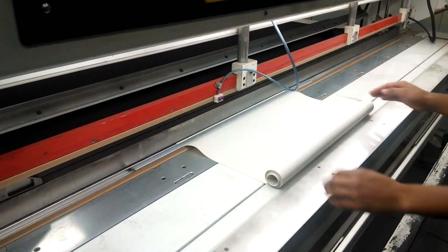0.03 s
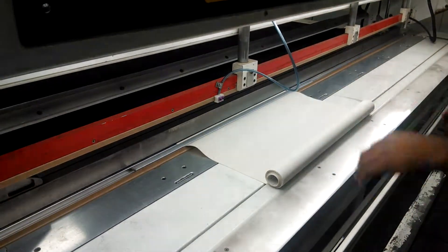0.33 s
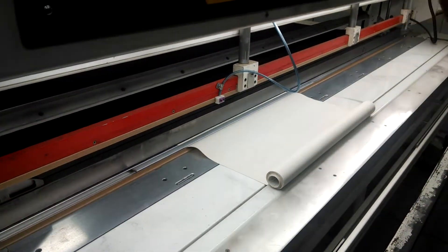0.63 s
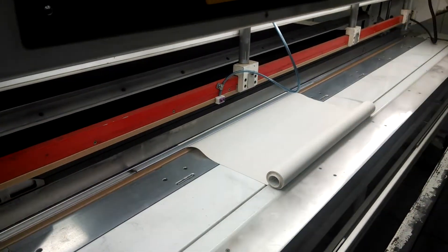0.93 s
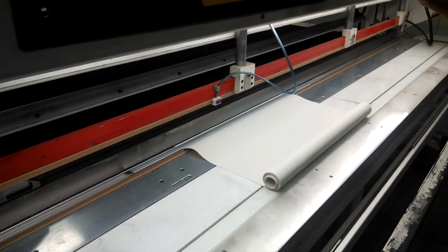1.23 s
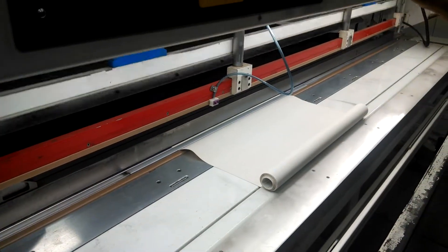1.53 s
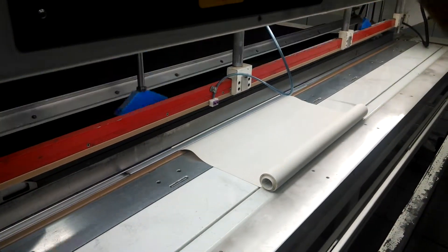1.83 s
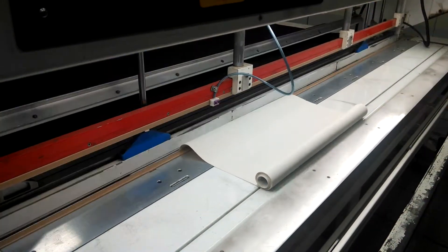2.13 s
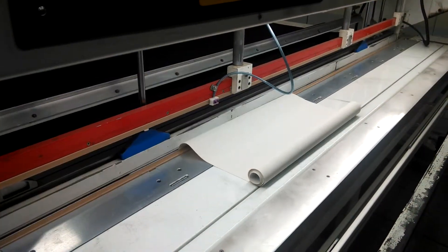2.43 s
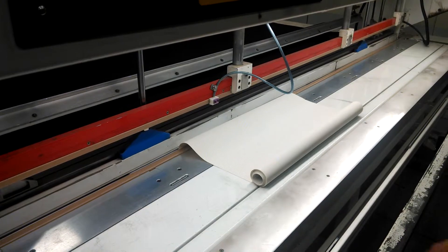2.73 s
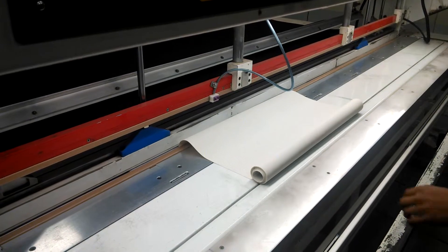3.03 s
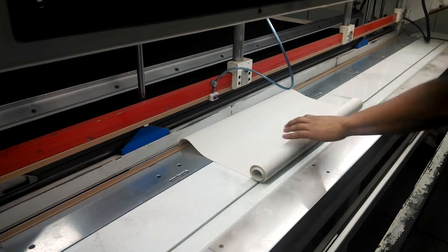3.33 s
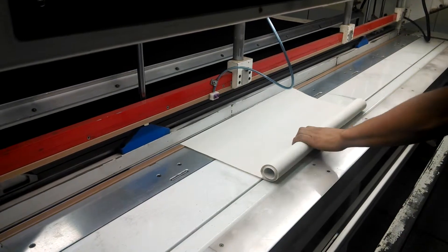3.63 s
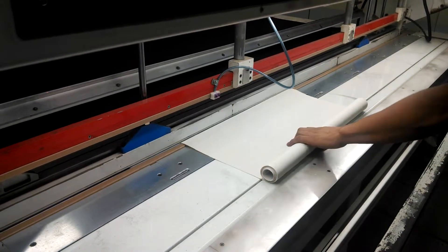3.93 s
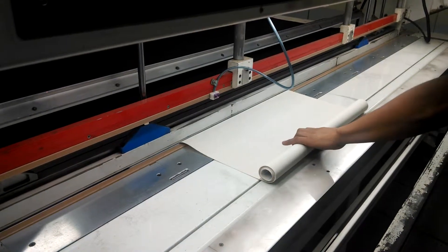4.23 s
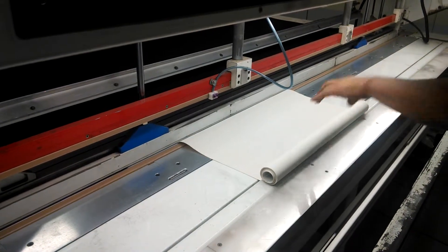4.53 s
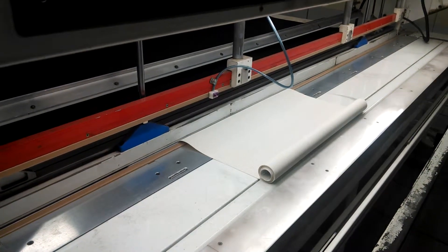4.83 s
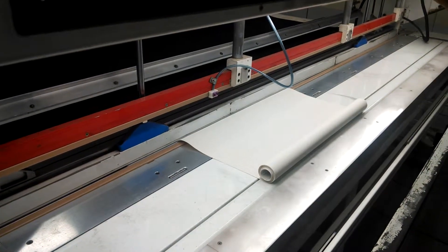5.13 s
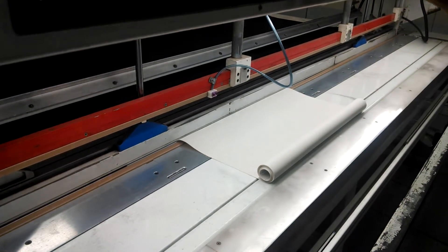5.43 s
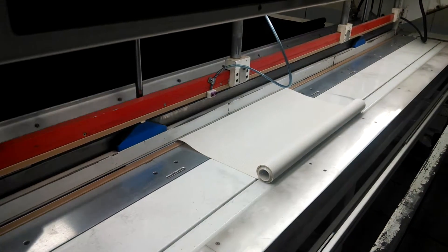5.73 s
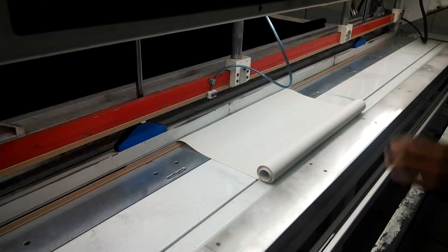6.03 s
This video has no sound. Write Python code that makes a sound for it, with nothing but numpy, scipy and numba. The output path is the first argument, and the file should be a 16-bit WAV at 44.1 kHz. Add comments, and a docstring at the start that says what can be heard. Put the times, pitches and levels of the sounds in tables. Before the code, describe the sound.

A faint workshop rumble runs underneath, with a slight rustle of plastic film at the start. From about 0.9 seconds come a tiny puff of air and several light valve clicks. At 1.4 seconds a nearby pneumatic sealer pops and releases a loud, bright hiss, slightly to the right, with an extra spurt at 1.9. It ends around 2.2 seconds with sharp snaps and a knock as the bar seats. The background dips, then slowly returns. Around 3.6 seconds a hand softly pats the film roll, crinkling it and faintly ringing the steel table. Valves click again between 5 and 5.4 seconds. At 5.5 a second loud hiss begins and gradually dulls. Around 6 seconds the rising bar knocks and judders with a short groan, then clanks against its top stop at about 6.3 as the air dies away.

```python
"""A workshop with a pneumatic bag sealer. Film rustles, valves clack, air exhausts loudly and the
sealing bar comes down on the film. A hand lands on the film roll and rings the steel table; air blasts
again and the bar judders back up to its top stop. A phone close by turns its gain down in each blast,
so the shop's rumble sinks and slowly returns."""
import sys
import numpy as np
from scipy import signal
from scipy.fft import rfft, irfft, next_fast_len
from scipy.io import wavfile
from scipy.ndimage import uniform_filter1d
from numba import njit

SR = 44100
rng = np.random.default_rng(int(sys.argv[2]) if len(sys.argv) > 2 else 0)


def waveform_to_disk(signal):
    """Save audio, clipped to [-1, 1], as 16-bit WAV at the path in sys.argv[1]."""
    frames = np.transpose(np.atleast_2d(signal))
    scaled = np.clip(frames, -1, 1) * 32767
    samples = np.round(scaled).astype(np.int16)
    wavfile.write(sys.argv[1], SR, samples)


N = 276507
TIME = np.arange(N) / SR
NFFT = next_fast_len(N + SR)
FREQ = np.arange(NFFT // 2 + 1) * SR / NFFT + 1e-9


def undb(db):
    """Decibels to gain."""
    return 10 ** (np.asarray(db) / 20)


def unit(x):
    """Scale to unit rms."""
    return x / np.sqrt(np.mean(x ** 2))


def along(points, hz=FREQ):
    """Interpolate (f/Hz, value) points over log frequency."""
    f, value = np.transpose(points)
    return np.interp(np.log(hz), np.log(f), value)


def shape(x, response):
    """Filter by a frequency response."""
    return irfft(rfft(x, NFFT) * response, NFFT)[..., :N]


def noise(colour):
    """Unit noise coloured by (f/Hz, level/dB) points."""
    return unit(shape(rng.standard_normal(N), undb(along(colour))))


def resonances(rows):
    """Response of parallel (f/Hz, width/Hz, level/dB) resonators."""
    return sum(undb(db) / (1 + 1j * hz / width * (FREQ / hz - hz / FREQ)) for hz, width, db in rows)


def waver(rate_hz):
    """Smooth random motion, unit rms."""
    step = int(SR / rate_hz)
    held = np.repeat(rng.standard_normal(N // step + 1), step)
    return unit(uniform_filter1d(held, step)[:N])


def fade(t, t60):
    """Exponential decay from t = 0, silent before."""
    return (t >= 0) * np.exp(-np.log(1000) * np.clip(t / t60, 0, 10))


def gate(start, length, attack_s, t60_s):
    """Envelope: rise, hold, decay."""
    return np.clip((TIME - start) / attack_s, 0, 1) * fade(np.maximum(TIME - start - length, 0), t60_s)


def swells(rows):
    """Envelope of bursts that swell to their peak time, then decay."""
    return sum(undb(db) * np.where(TIME < s, np.exp(-np.minimum(abs(TIME - s) / rise, 20)),
                                   fade(TIME - s, t60)) for s, db, rise, t60 in rows)


def diffuse(alike_hz, likeness):
    """Diffuse noise at the two mics: partly alike in the bass, unrelated in the treble."""
    alike = likeness / (1 + (FREQ / alike_hz) ** 2)
    mid, side = (shape(rng.standard_normal(N), np.sqrt((1 + sign * alike) / 2)) for sign in (1, -1))
    return np.array([mid + side, mid - side])


# Impact noise spectra: f/Hz, level/dB
CLACK_SPECTRUM = [(30, -58), (110, -23), (250, -5), (500, -2.5), (850, 0), (1500, -9), (2200, -5),
                  (3500, -10), (6000, -33), (12000, -43)]
TICK_SPECTRUM = [(1200, -20), (3400, 2), (6000, -3.5), (10000, -1), (15500, -14.5)]

def blows(rows, modes, detune):
    """Impacts as (noise, ring): a dense metal clack with a bright tick, and the body's modes."""
    clack, tick, ring = np.zeros((3, N))
    t = TIME[:SR]
    hz, mode_db, mode_t60 = np.transpose(modes)[:, :, None]
    decays = undb(mode_db) * fade(t, mode_t60) / np.sqrt(np.sum(undb(mode_db) ** 2) / 2)
    signs = (-1) ** np.arange(len(hz))[:, None]  # adjacent modes in antiphase
    for s, clack_db, ring_db, tick_db, t60 in rows:
        clack += undb(clack_db) * fade(TIME - s, t60)
        tick += undb(tick_db) * fade(TIME - s, 0.54 * t60)
        struck_hz = hz * (1 + detune * rng.standard_normal(hz.shape))
        tone = np.sum(signs * decays * np.sin(2 * np.pi * struck_hz * t), axis=0)
        start = int(s * SR)
        ring[start:start + SR] += undb(ring_db) * tone[:N - start]
    return clack * noise(CLACK_SPECTRUM) + tick * noise(TICK_SPECTRUM), ring


# Shop noise spectrum; mains and electronics tones: f/Hz, level/dB
SHOP_SPECTRUM = [(25, -5.5), (60, 1), (120, -2.5), (200, -4.5), (400, -7), (800, -14), (1600, -21.5),
                 (4000, -23), (7000, -26), (9500, -25), (15500, -28.5)]
HUM_TONES = [(59.2, -67.5), (118.4, -63), (14998, -80)]

def shop():
    """Rumble of far machines, thin hiss and mains hum."""
    rumble = unit(shape(diffuse(alike_hz=400, likeness=0.26), undb(along(SHOP_SPECTRUM))))
    rumble *= undb(-52.5 + 0.49 * waver(12))
    hum = sum(undb(db + 2 * waver(3.4)) * np.sqrt(2) * np.sin(2 * np.pi * hz * TIME)
              for hz, db in HUM_TONES)
    return (rumble + hum) * undb([[-1], [.7]])


# Film rustles and, at 0.85 s, a puff of leaking air: t/s, level/dB, rise/s, t60/s
RUSTLES_AND_PUFF = [(.05, -52, 0.07, 0.53), (.3, -56, 0.034, .3), (.85, -59.5, 0.008, 0.59),
                    (3.558, -56, 0.0091, 0.14), (3.588, -41.5, 0.017, 0.15), (3.684, -42.5, 0.0085, 0.027),
                    (3.71, -37, 0.0024, 0.048), (4.48, -59.5, 0.06, 0.32)]
# Their spectrum: f/Hz, level/dB
RUSTLE_SPECTRUM = [(200, 0), (900, 5), (2000, -0.5), (4000, -1.5), (8000, -4), (12000, -0.5), (15500, -9.5)]

def film_and_leak(crinkle_db):
    """Plastic film rustles in fine uneven grains; a faint puff of air leaks before the first stroke."""
    grains = unit(undb(crinkle_db * waver(500)))
    return swells(RUSTLES_AND_PUFF) * grains * noise(RUSTLE_SPECTRUM)


# Air spurts: seals closing, a leak before the first stroke, and a swell of the exhaust's 4-5 kHz whistle near
# the end of the down stroke: t/s, spit/dB, rise/s, t60/s, whistle f/Hz, whistle/dB
AIR_SPURTS = [(.9, -54.5, .04, .4, 4100, -58), (1.882, -3, 0.0041, .18, 8600, -19),
              (2.165, -24, .06, .1, 4363, -9), (2.237, -11, .001, 0.17, 10530, -17),
              (5.861, -15, 0.011, 0.12, 8240, -11), (6.061, -0.5, 0.00064, 0.08, 9500, -6),
              (6.11, -16, 0.0079, 0.034, 10100, -9)]
# Air past the spool: nominal lead/s, level/dB, rise/s, t60/s
SPOOL_SPITS = [(.0873, -14, 0.00071, 0.05), (.059, -16.5, 0.0023, .07)]
# Spit spectrum: f/Hz, level/dB
SPIT_SPECTRUM = [(500, -30), (2500, -10.5), (4000, -8), (6500, -4), (9000, 2.5), (12500, -2.5),
                 (15500, -9.5)]

def spurts(width_hz):
    """Air spits as a valve shifts or a seal closes, and the exhaust swells near 4.4 kHz before the down stroke
    ends; each spurt whistles hoarsely at its own pitch."""
    spool = [(s, db + gain_db, rise, t60) for s, gain_db, (db, rise, t60) in before_strokes(SPOOL_SPITS)]
    spit = swells(spool + [row[:4] for row in AIR_SPURTS]) * noise(SPIT_SPECTRUM)
    air = rng.standard_normal(N)
    whistles = sum(swells([(s, db, rise, t60)]) * unit(shape(air, resonances([(hz, width_hz, 0)]) ** 2))
                   for s, _, rise, t60, hz, db in AIR_SPURTS)
    return spit + whistles


# Switch and spool clicks: t/s, clack/dB, ring/dB, tick/dB, clack t60/s
VALVE_CLICKS = [(.966, -45, -51, -51, 0.076), (1.082, -41, -49, -56, 0.083), (1.125, -60, -56, -68, 0.054),
                (1.2995, -40, -43, -69, 0.048), (5.045, -37.5, -39.5, -51, 0.073),
                (5.1085, -35, -39.5, -47.5, 0.055), (5.3738, -31.5, -35, -38.5, 0.047)]
# Valve housing modes: f/Hz, level/dB, t60/s
HOUSING_MODES = [(149, -9.5, .16), (200, -0.5, 0.16), (263, -3, 0.19), (590, -6.5, .07), (730, -5, .06),
                 (790, -5.5, 0.09), (875, -6, 0.06), (1130, -6.5, 0.06), (1470, -12.5, .06),
                 (1940, -9.5, 0.078)]

def valve_clicks():
    """Switches and spools click before each stroke and ring the housing."""
    return blows(VALVE_CLICKS, HOUSING_MODES, detune=0.025)


def before_strokes(rows):
    """Repeat valve events ahead of each stroke: (t/s, gain/dB, rest of row)."""
    return [(opens - slowness * lead, db, rest)
            for opens, *_, slowness, db in BAR_STROKES for lead, *rest in rows]


# Spool knocks: nominal lead/s, clack/dB, ring/dB, tick/dB, clack t60/s
SPOOL_BLOWS = [(.096, -36.5, -45.5, -40.5, 0.077), (.0791, -16, -38.5, -32, .042),
               (.047, -25.5, -30, -28.5, .12)]
# Bar jolts: t/s, clack/dB, ring/dB, tick/dB, clack t60/s
BAR_JOLTS = [(1.4336, -14, -20.5, -5, 0.024), (1.795, -28, -30, -37, 0.073), (2.234, -8, -23, -1, 0.057),
             (5.519, -18.5, -26, -22, 0.067), (5.939, -19, -21, -36, 0.097), (6.0578, -5.5, -19, -14, 0.19),
             (6.207, -14, -21.5, -15.5, 0.25)]
# Frame and bar modes: f/Hz, level/dB, t60/s
FRAME_MODES = [(112, -21.5, .2), (147, -5, 0.36), (213, 1, 0.16), (261, -1, 0.3), (313, -4, 0.15),
               (366, -4.5, 0.15), (443, -8, 0.079), (607, -11.5, 0.12), (814, -12.5, 0.13),
               (1068, -7, 0.23), (1480, -5, 0.07)]

def frame_knocks():
    """The shifting spool knocks the frame; the bar jolts it as it starts, travels and stops."""
    spool = [(s, clack + db, ring + db, tick + db, t60)
             for s, db, (clack, ring, tick, t60) in before_strokes(SPOOL_BLOWS)]
    return blows(spool + BAR_JOLTS, FRAME_MODES, detune=0.027)


# Exhaust fitting resonances: f/Hz, width/Hz, level/dB
FITTING_RESONANCES = [(3280, 60, 6.5), (3835, 30, -9), (4000, 40, -12.5), (4100, 40, -4.5),
                      (5000, 75, -4.5), (6200, 82, -2), (6330, 40, 1), (10400, 60, -8.5), (12740, 35, -5),
                      (14332, 56, 0)]

def exhaust(stroke, port, flutter_db, whistle_db, surge_db=0.5, surge_s=0.071):
    """Turbulent jet through ringing fittings: surges, drifts with pressure, flutters with its eddies."""
    opens, length, flow_db, flow_drift, treble_db, treble_drift = stroke[:6]
    age = np.clip(TIME - opens, 0, length)
    level_db = flow_db + flow_drift * age + surge_db * np.exp(-age / surge_s)
    hiss = noise(port)
    whistle = shape(hiss, resonances(FITTING_RESONANCES)) * undb(whistle_db + 6 * waver(12))
    jet = unit(hiss + whistle)
    treble = shape(jet, 1 / (1 + (7500 / FREQ) ** 6))
    top = shape(treble, 1 / (1 + (11000 / FREQ) ** 12))
    bands = (jet - treble, treble - top, top)
    body, sizzle, top = (band * undb(flutter_db * waver(25)) for band in bands)
    jet = body + (sizzle + top) * undb(treble_db + treble_drift * age)
    flow = gate(opens, length, attack_s=.004, t60_s=0.17)
    return jet * flow * undb(level_db + flutter_db * waver(70))


# Strokes, down then up: t/s, length/s, flow/dB, flow drift/(dB/s), treble/dB, treble drift/(dB/s),
# valve lead factor, valve gain/dB
BAR_STROKES = [(1.4324, 0.8, -6, 1.5, 1, 1, 1, 0.5), (5.518, .8, -8.5, -5, 1.5, -19.5, 1.04, 1.5)]
# Exhaust port spectra: f/Hz, level/dB
DOWN_SPECTRUM = [(30, -55), (90, -34.5), (170, -15.5), (500, -13.5), (1200, -15), (2000, -7.5),
                 (2700, -11.5), (3400, -2.5), (4800, 0), (5600, -4.5), (7000, 0.5), (9300, -3), (12000, 1),
                 (14000, 1), (15500, -4)]
UP_SPECTRUM = [(30, -47), (90, -29), (230, -14.5), (700, -21.5), (1700, -8), (3000, -5), (3900, -2.5),
               (5500, -3), (7000, 0), (10000, -5.5), (12000, 1), (15500, -3)]

def exhaust_layer(space):
    """One noise layer of the exhaust on both strokes, mostly reflected from inside the machine."""
    down, up = BAR_STROKES
    air = exhaust(down, DOWN_SPECTRUM, flutter_db=1.38, whistle_db=-7)
    air += exhaust(up, UP_SPECTRUM, flutter_db=1.5, whistle_db=-16)
    return place(air, space, scatter_db=7.5, tail_db=1.0, lag_ms=.33)


# Far mic relative to near mic: f/Hz, level/dB
MIC_SHADOW = [(100, -0.5), (1500, 1.5), (5000, 0.5), (7000, -6.5), (9500, -14), (15000, -12)]

def pneumatics(space):
    """Exhaust hiss and spurts on the right; the left mic is shaded from their treble."""
    # One hiss: two independent noise layers with separate reflections smooth its colour
    hiss = (exhaust_layer(space) + exhaust_layer(room())) / np.sqrt(2)
    spits = place(spurts(width_hz=3300), space, scatter_db=-2.5, tail_db=-4.0, lag_ms=.33)
    left, right = hiss + spits
    return np.array([shape(left, undb(along(MIC_SHADOW))), right])


# Pressure fronts as the exhaust opens: t/s, level/dB, half width/s, pipe ring/dB
PRESSURE_FRONTS = [(1.4336, -3, 0.0006, -7), (5.522, -17.5, 0.00086, -17)]

def pops(pipe_hz, pipe_t60_s, low_cut_hz):
    """Trapped air lets go in one pressure swing; the pipe rings, its small mouth gives no deep bass."""
    pressure = np.zeros(N)
    for s, db, width, pipe_db in PRESSURE_FRONTS:
        swing = (s - TIME) / width
        pressure += undb(db) * swing * np.exp(-np.minimum(swing ** 2, 99) / 2)
        age = TIME - s + width
        pressure += undb(pipe_db) * np.sin(2 * np.pi * pipe_hz * age) * fade(age, pipe_t60_s)
    return signal.sosfilt(signal.butter(2, low_cut_hz, "high", fs=SR, output="sos"), pressure)


# Latch snaps: t/s, clack/dB, ring/dB, tick/dB, clack t60/s
LATCH_SNAPS = [(2.1775, -34.5, -3, 7.5, .009), (2.1838, -27.5, 1.5, 3, .01),
               (2.1932, -26.5, 9.5, 8.5, .008), (6.0592, -22, -18, 5, 0.029)]
# Latch modes: f/Hz, level/dB, t60/s
LATCH_MODES = [(4170, -2.5, .009), (4630, 0, .011), (6310, -1.5, .012), (8700, -1.5, .014),
               (10800, -6.5, .009)]

def latch(space):
    """Small steel parts snap near the phone as the bar seats, and once on the way up."""
    crack, ring = blows(LATCH_SNAPS, LATCH_MODES, detune=0.02)
    return place(crack + ring, space, scatter_db=-10, tail_db=-12.5, lag_ms=0.17) * undb([[-6], [0]])


# Bar rubbing its guide: t/s, length/s, level/dB
GUIDE_RUBS = [(2.24, .065, -27), (5.949, .066, -21), (6.022, 0.032, -17), (6.063, .076, -9.5),
              (6.147, .1, -17)]
# Guide resonances: f/Hz, width/Hz, level/dB
GUIDE_RESONANCES = [(324, 67, -3), (422, 33, -2), (604, 30, -13.5), (1087, 30, -10.5)]

def judder(slip_hz, sharp_hz, jitter, rough_db, scrape_db, octave_db, low_cut_hz):
    """The bar sticks and slips as it seats and on its way up; each groan starts sharp and settles."""
    hz = slip_hz + sharp_hz * np.max([fade(TIME - s, t60=.2) for s, _, _ in GUIDE_RUBS], axis=0)
    pressure = sum(undb(db) * gate(s, length, attack_s=0.012, t60_s=0.029)
                   for s, length, db in GUIDE_RUBS)
    phase = 2 * np.pi * np.cumsum(hz * (1 + jitter * waver(120))) / SR
    groan = unit(np.sin(phase) + undb(octave_db) * np.sin(2 * phase)) * undb(rough_db * waver(110))
    guide = resonances(GUIDE_RESONANCES) / (1 + (low_cut_hz / FREQ) ** 6)
    scrape = unit(shape(rng.standard_normal(N), guide))
    return (groan + undb(scrape_db) * scrape) * pressure


# Roll on the table: t/s, clack/dB, ring/dB, tick/dB, clack t60/s
ROLL_PATS = [(3.577, -37.5, -31, -63, 0.25), (3.683, -49.5, -56, -56, 0.038)]
# Table top modes: f/Hz, level/dB, t60/s
TABLE_MODES = [(284, -5, 0.3), (309.7, -5, 0.36), (338.7, -3, 0.5), (378.5, -2, 0.44), (387, -2, 0.54),
               (405, -8, 0.43), (454, -5.5, 0.6), (481, -10, 0.87), (552, -3.5, 0.31), (575, -5, 0.31),
               (580, -4.5, 0.78), (662, -16, 1), (783, -12, .35), (940, -10, 0.18), (1462, -16, 0.23)]

def hand_on_roll():
    """A hand presses the film roll down and rings the steel table."""
    return blows(ROLL_PATS, TABLE_MODES, detune=0.0042)


# Bar on its top stop: t/s, clack/dB, ring/dB, tick/dB, clack t60/s
STOP_CLANKS = [(6.2495, -9, -6, -2.5, 0.067), (6.262, -3.5, -5.5, -4, 0.27)]
# Top stop modes: f/Hz, level/dB, t60/s
STOP_MODES = [(1230, -1, .05), (1406, -2, 0.09), (1492, -4, .05), (1636, -3, .05), (1980, -5, 0.062)]

def top_stop():
    """The bar clanks against its top stop and bounces."""
    return blows(STOP_CLANKS, STOP_MODES, detune=0.018)


# Workshop reverberation: f/Hz, t60/s
SHOP_DECAY = [(100, 0.25), (400, 1), (1500, 0.65), (4000, 0.84), (7000, 0.55), (11000, 0.58), (15000, 0.1)]

def room():
    """Two stereo responses: quick scatter inside the machine, and the workshop's tail."""
    field, t = diffuse(alike_hz=1200, likeness=0.76), TIME[:SR]
    centres_hz = np.geomspace(100, 15000, 9)
    hz = np.arange(SR // 2 + 1) + 1e-9
    spectrum = rfft(field[:, :SR])
    tail = np.zeros((2, SR))
    for centre, weights in zip(centres_hz, np.eye(len(centres_hz))):
        band = irfft(spectrum * np.interp(np.log(hz), np.log(centres_hz), weights), SR)
        tail += band * fade(t - .008, along(SHOP_DECAY, centre))
    scatter = field[:, SR:2 * SR] * fade(t - .001, t60=0.056)
    return [rfft(r / np.sqrt(np.sum(r ** 2) / 2), NFFT) for r in (scatter, tail)]


def place(x, space, scatter_db, tail_db, lag_ms=0):
    """Direct sound, lag_ms later on the left, plus scatter and tail; total power is kept."""
    direct = np.array([np.exp(-2j * np.pi * FREQ * lag_ms / 1000), np.ones(len(FREQ))])
    near, far = undb(scatter_db), undb(tail_db)
    return shape(x, (direct + near * space[0] + far * space[1]) / np.sqrt(1 + near ** 2 + far ** 2))


def scene():
    """Air from the right; frame, bar and table ahead, slightly right; the shop all around."""
    space = room()
    knocks, frame_ring = frame_knocks()
    clicks, housing_ring = valve_clicks()
    pats, table_ring = hand_on_roll()
    clanks, stop_ring = top_stop()
    rustle = film_and_leak(crinkle_db=1.5)
    pop = pops(pipe_hz=1630, pipe_t60_s=.008, low_cut_hz=190)
    groan = judder(slip_hz=300.4, sharp_hz=32.4, jitter=.025, rough_db=2,
                   scrape_db=-3.5, octave_db=-23, low_cut_hz=130)
    impacts = place(knocks + clanks, space, scatter_db=-3.5, tail_db=-2.5, lag_ms=0.013)
    handling = place(clicks + pats + rustle, space, scatter_db=0.5, tail_db=-1.0, lag_ms=0.022)
    ringing = frame_ring + housing_ring + table_ring + stop_ring
    machine = place(ringing, space, scatter_db=-3.5, tail_db=-4.5)
    machine += place(pop, space, scatter_db=-16, tail_db=-17)
    machine += place(groan, space, scatter_db=-9, tail_db=-17.5)
    machine *= undb([[-1], [2.6]])
    return pneumatics(space) + impacts + handling + machine + latch(space) + shop()


@njit
def follow(power, attack, release):
    """Power follower with separate rise and fall rates."""
    out, held = np.empty(len(power)), 0.
    for i in range(len(power)):
        held += (power[i] - held) * (attack if power[i] > held else release)
        out[i] = held
    return out


def gain_control(x, threshold_db, attack_s, release_s):
    """Turn down what exceeds the threshold, looking a few milliseconds ahead."""
    power = uniform_filter1d(np.mean(x ** 2, axis=0), size=400)
    held = follow(power, 1 / (attack_s * SR), 1 / (release_s * SR))
    return x / np.sqrt(np.maximum(1, held / undb(threshold_db) ** 2))


# Opposite mic subtracted: f/Hz, share
MIC_CROSSFEED = [(300, 0.022), (1200, 0.73), (2650, 1), (3950, 0.28), (5300, 0.47), (7000, 0.17),
                 (15000, 0.04)]

def record(dry):
    """The phone widens the stereo by delayed crossfeed, rides its gain, clips and cuts the top."""
    mic_delay_s, top_hz = 1 / 2634, 15450
    share = np.clip(along(MIC_CROSSFEED), 0, 1)
    norm = np.sqrt(1 + share ** 2)
    delay = np.exp(-2j * np.pi * FREQ * mic_delay_s)
    wide = shape(dry, 1 / norm) - shape(dry[::-1], share / norm * delay)
    levelled = gain_control(wide, threshold_db=-16.5, attack_s=0.011, release_s=0.69)
    lowpass = signal.ellip(10, .2, 70, top_hz, fs=SR, output="sos")
    return signal.sosfilt(lowpass, np.clip(levelled, -1, 1))


dry = scene()
out = record(dry)
waveform_to_disk(out)
```